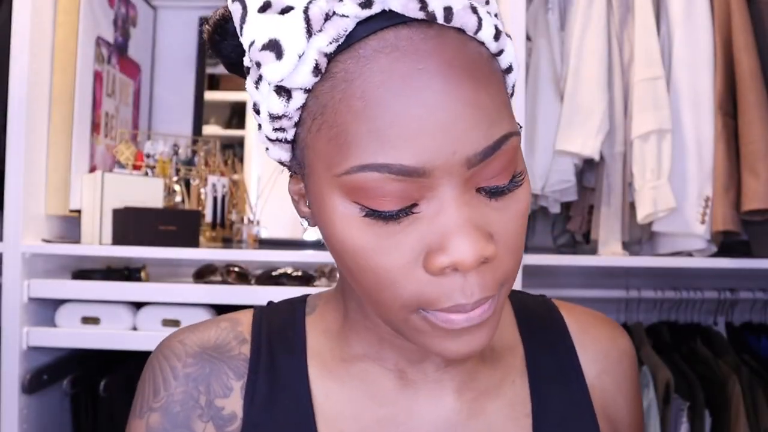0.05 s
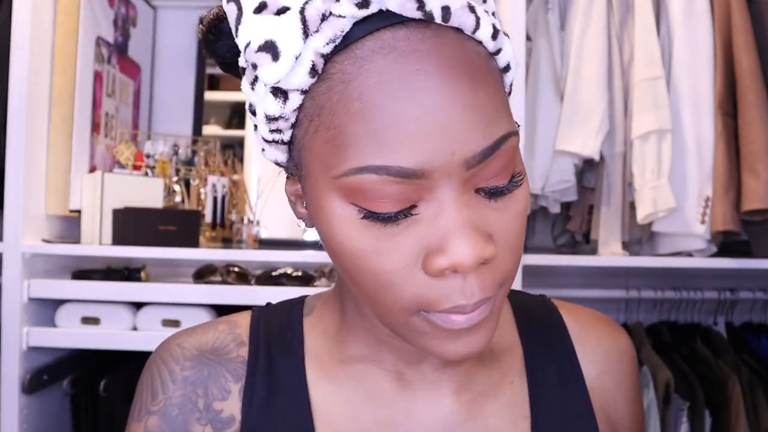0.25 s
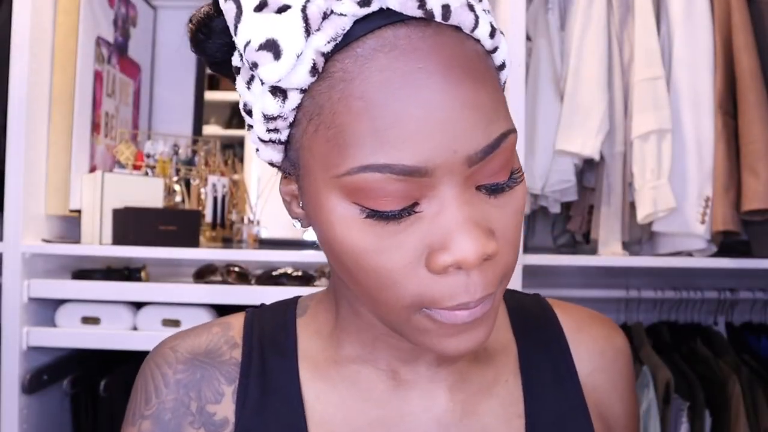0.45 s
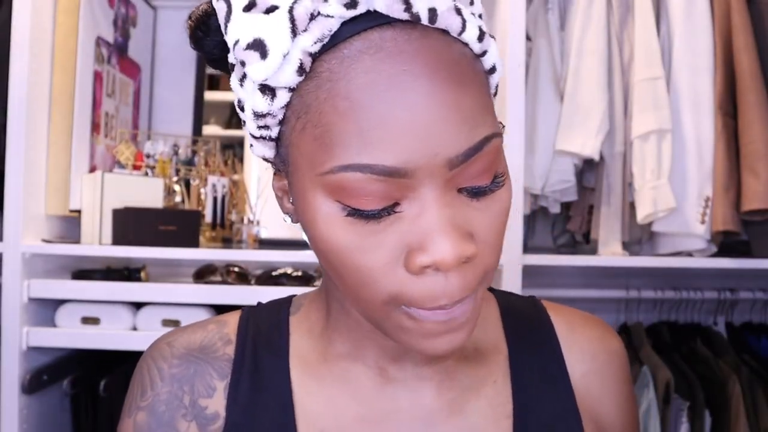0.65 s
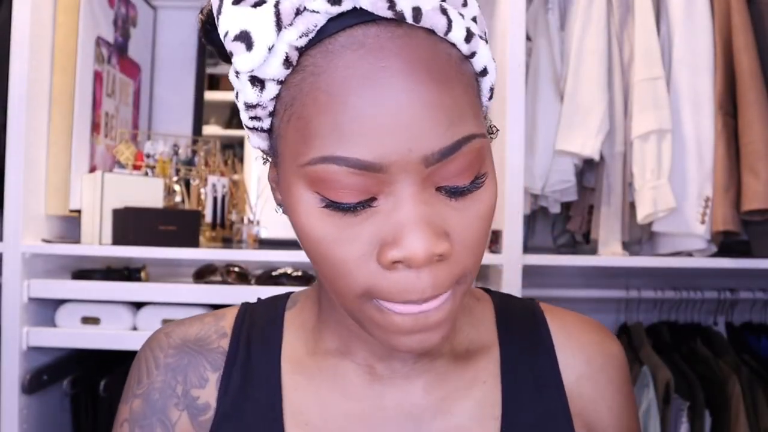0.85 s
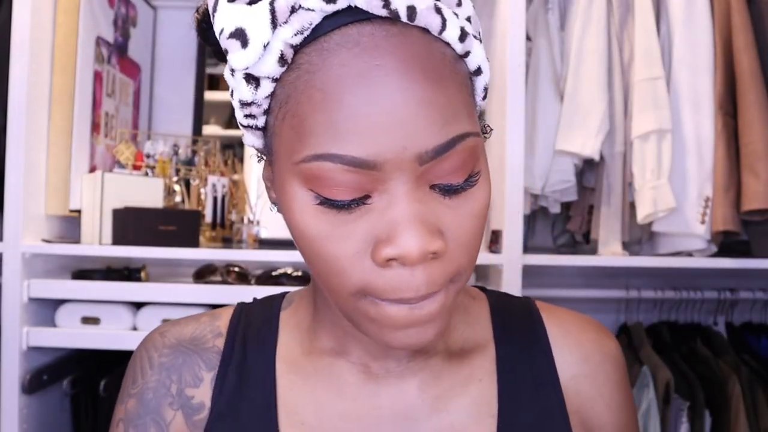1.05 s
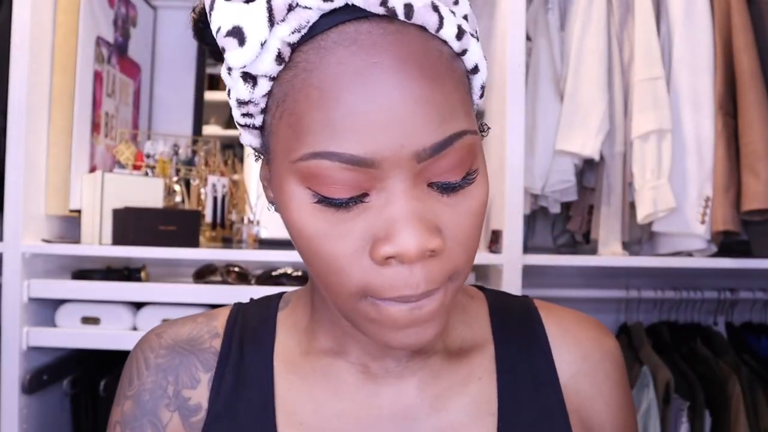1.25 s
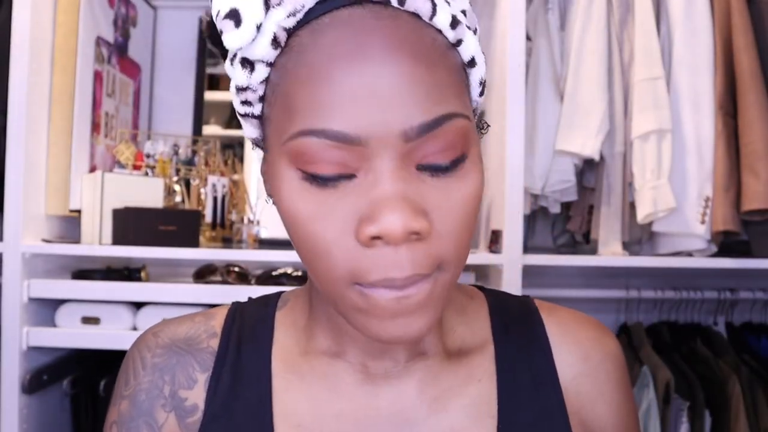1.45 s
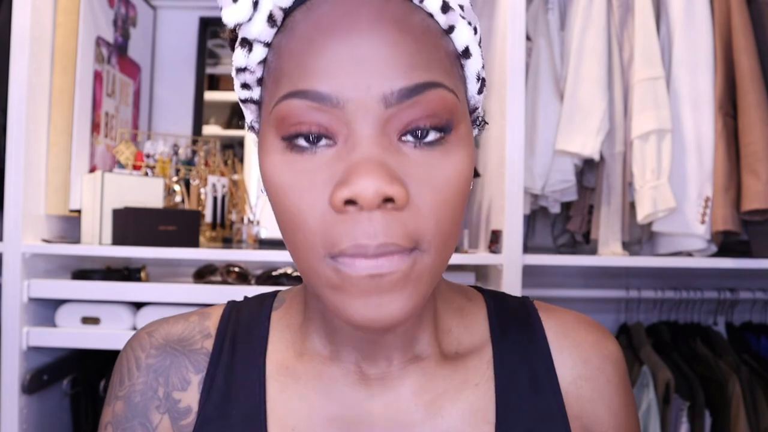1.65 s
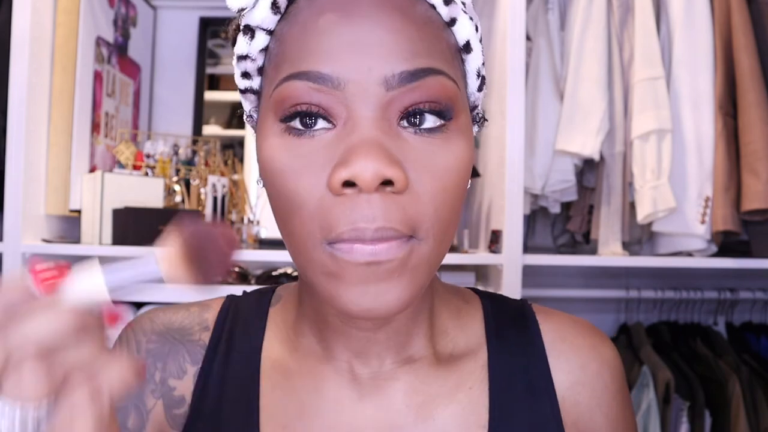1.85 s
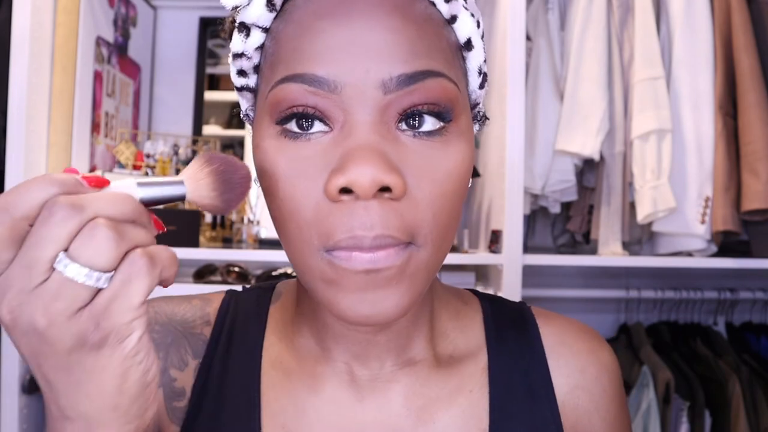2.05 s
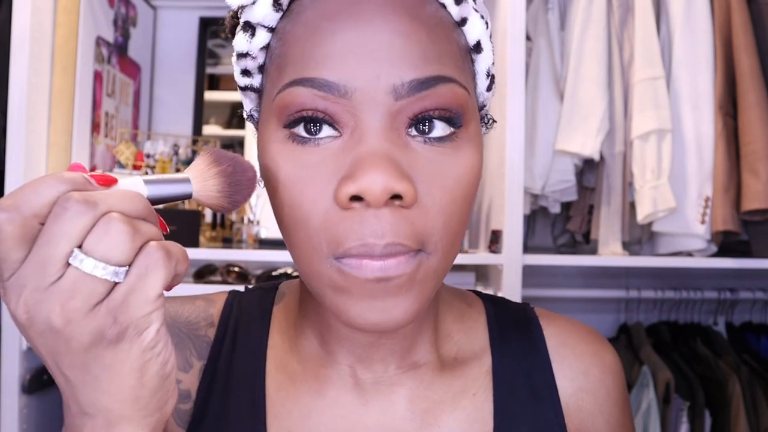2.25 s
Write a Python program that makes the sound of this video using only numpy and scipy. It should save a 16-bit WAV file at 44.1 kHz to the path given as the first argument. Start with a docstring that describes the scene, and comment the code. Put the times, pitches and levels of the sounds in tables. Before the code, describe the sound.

A plastic powder compact and brush handle clatter briefly on a wooden table with a soft drag of bristles. Two small lid clicks follow, then a fainter one, close to the microphone in a quiet closet.

```python
"""A clothes-lined closet, a camera's stereo microphone close to a wooden dressing table.
A plastic powder compact and a brush handle clatter on the wood: each knock is a short rattle of hard
contacts that cracks brightly and rings the hollow case and table top. Bristles and case drag softly.
Three small dry ticks of the lid follow, the last with a faint rustle of the arm, over quiet room tone."""
import sys
import numpy as np
from scipy import signal
from scipy.fft import rfft, irfft
from scipy.io import wavfile

SR = 44100
rng = np.random.default_rng(int(sys.argv[2]) if len(sys.argv) > 2 else 0)


def unload_audio(sound):
    """Save the sound as a 16-bit wav file, at the path given as the first command line argument."""
    columns = np.transpose(np.atleast_2d(sound))
    # keep every value between -1 and 1, then stretch to whole-number steps
    steps = np.round(np.clip(columns, -1, 1) * 32767)
    wavfile.write(sys.argv[1], SR, steps.astype(np.int16))


N = 101121
HZ = np.maximum(np.arange(N // 2 + 1) * SR / N, 1)

# Modes of the hollow case and table top. Each row: pitch in Hz, relative level in dB, T60 in seconds.
BODY_MODES = [(192.8, 0, 0.05), (439, -0.5, 0.076), (449.6, -3, 0.037), (531, -9.5, 0.075), (624, -7, .065),
              (673, 0.15, 0.046), (788, -11.5, 0.17), (878, -7, 0.041), (933, -11, 0.055),
              (1059, -2, 0.028), (1200, -3, 0.033), (1288, -10.5, .045), (1408, -8, 0.031),
              (1801, -4, 0.017)]


def amp(db):
    """Decibels to gain."""
    return 10 ** (np.asarray(db) / 20)


def at_hz(points, hz):
    """Reads a table on a log-frequency axis."""
    return np.interp(np.log(hz), np.log(np.array(points)[:, 0]), np.array(points)[:, 1])


def filtered(x, response):
    """Applies a frequency response given on HZ."""
    return irfft(rfft(x) * response, N)


def high_pass(x, hz):
    """Steep bass cut."""
    return signal.sosfilt(signal.butter(4, hz, "high", fs=SR, output="sos"), x)


def resonance(x, hz, q):
    """One broad peak around hz."""
    return signal.lfilter(*signal.iirpeak(hz, q, fs=SR), x)


def ring(clicks, hz, t60):
    """Each click starts a sine that dies by 60 dB in t60 seconds."""
    decay, angle = amp(-60 / (t60 * SR)), 2 * np.pi * hz / SR
    return signal.lfilter([0, np.sin(angle)], [1, -2 * decay * np.cos(angle), decay ** 2], clicks + 1e-18)


def add(out, start, x):
    """Mixes x in at start seconds."""
    i = int(start * SR)
    out[i:i + len(x)] += x[:N - i]


def room_tone():
    """Soft air and microphone hiss, centre and sides coloured apart; the lowest air swells at random."""
    # Spectra of the centre and the sides. Each row: frequency in Hz, relative level in dB.
    mid_colour = [(12, -34.5), (20, -8), (49, -0.5), (393, -9.5), (491, -10.5), (746, -14), (834, -15),
                  (3540, -24.5), (6720, -33), (11700, -47.5), (15500, -48)]
    side_colour = [(12, -70.5), (20, -38), (129, -4.5), (315, -0.5), (549, -3.5), (631, -4.5), (881, -5.5),
                   (4680, -19), (11400, -28.5), (13900, -35), (15500, -73)]
    rumble_hz, swell_db, left_lean = 58.6, 4.5, 0.11
    mid_noise, side_noise = rng.standard_normal((2, N))
    drift = filtered(rng.standard_normal(N), np.exp(-HZ / 5))
    mid = filtered(mid_noise, amp(at_hz(mid_colour, HZ)))
    rumble = filtered(mid, 1 / (1 + (HZ / rumble_hz) ** 4))
    mid = mid - rumble + rumble * amp(swell_db * drift / drift.std())
    side = filtered(side_noise + left_lean * mid_noise, amp(at_hz(side_colour, HZ)))
    mid, side = amp(-61.5) * mid / mid.std(), amp(-59.5) * side / side.std()
    return np.array([mid + side, mid - side])


def air_puff():
    """A push of air at the microphone: one soft low bump, the same in both ports."""
    push = np.zeros(N)
    push[int(.187 * SR)] = amp(-49)
    return ring(push, hz=42, t60=.09)


def closet():
    """Stereo impulse response: early reflections off table and shelves, then a tail dying by band."""
    # Decay among the clothes. Each row: frequency in Hz, T60 in seconds.
    decay_times = [(200, .13), (1000, .17), (4000, .11), (7000, .1), (12000, .1)]
    # Colour of the reflections. Each row: frequency in Hz, relative level in dB.
    colour = [(300, 9), (1500, 1), (4000, 1), (9000, -4.5), (13000, 0.5)]
    early_per_s, early_db, early_fall_s = 1500, 4.5, 0.0029
    t = np.arange(SR // 2) / SR
    edges = 100 * 2 ** np.arange(0, 7.6, .5)
    noise = rng.standard_normal((2, 2, len(t)))   # late and early, each left and right
    noise[1] *= (rng.random((2, len(t))) < early_per_s / SR) * np.sqrt(SR / early_per_s)
    response = 0
    for low, high in zip(edges, edges[1:]):
        hz = np.sqrt(low * high)
        late, early = signal.sosfilt(signal.butter(1, [low, high], "band", fs=SR, output="sos"), noise)
        late *= amp(-60 * t / at_hz(decay_times, hz))
        early *= amp(early_db) * np.exp(-t / early_fall_s)
        response += amp(at_hz(colour, hz)) * (late + early)
    fade_in = np.minimum(t / 0.00046, 1)
    return response / np.sqrt(np.sum(response ** 2) / 2) * fade_in


def microphone(x, lag_s, closet_db):
    """Direct sound reaches the nearer right port first and brighter; the closet answers on both."""
    # Right port over left, then the response of both. Each row: frequency in Hz, gain in dB.
    right_over_left = [(300, -1), (2000, 1), (6000, 2), (12000, 6)]
    mic_response = [(1000, 0), (12000, 2), (13500, -9.5), (16000, -10)]
    lean = np.sqrt(amp(at_hz(right_over_left, HZ)))
    left = filtered(x, np.exp(-2j * np.pi * HZ * lag_s) / lean)
    right = filtered(x, lean)
    reflected = amp(closet_db) * signal.fftconvolve(x[None], closet(), axes=1)[:, :N]
    return filtered(np.array([left, right]) + reflected, amp(at_hz(mic_response, HZ)))


def widen(x):
    """The camera lifts the difference between its ports in the treble and narrows the bass."""
    # Stereo width. Each row: frequency in Hz, gain of the side signal in dB.
    side_gain = [(250, -11), (500, -7), (1000, 2), (2000, 9), (4000, 4), (8000, 4), (12000, 7)]
    mid = (x[0] + x[1]) / 2
    side = filtered((x[0] - x[1]) / 2, amp(at_hz(side_gain, HZ)))
    return np.array([mid + side, mid - side])


def swish():
    """Bristles and case drag, and last the arm rustles: dense grains hiss and faintly stir the case."""
    # Each row: start, peak and end in seconds, gain in dB, centre of the hiss in Hz.
    strokes = [(0, 0.018, 0.24, -51, 1740), (0.077, 0.134, 0.21, -51, 3380),
               (0.203, .215, 0.29, -53.5, 3000), (0.26, 0.262, 0.35, -31, 3433),
               (0.3, 0.327, .42, -35, 1980), (.245, .25, .315, -30, 5000), (1.725, 1.926, 2.09, -66, 2262)]
    t, hiss = np.arange(N) / SR, np.zeros(N)
    for start, peak, end, db, hz in strokes:
        grains = rng.standard_normal(N) * rng.exponential(1, N)
        swell = np.interp(t, [start, peak, end], [0, 1, 0]) ** 2
        hiss += amp(db) * resonance(resonance(grains, hz, q=.6), hz, q=.6) * swell
    body = sum(amp(db) * ring(hiss, hz, t60) for hz, db, t60 in BODY_MODES)
    return hiss + amp(-23.5) * body


def lid_ticks():
    """Each tick is one hard contact with three tiny bounces and a short ring of the lid, no bass."""
    # Each row: start in seconds, gain in dB, centre and bass cut in Hz, bright edge and lid ring in dB.
    snaps = [(0.5454, -20, 9030, 3800, -2.5, -30), (0.6600, -18, 6500, 2104, 3.5, -30.5),
             (1.7625, -33.5, 7100, 2130, 5.5, -21.5)]
    # Each row: delay after the contact in seconds, level against it in dB.
    bounces = [(.0005, -23), (.0016, -5), (.0028, -23)]
    out = np.zeros(N)
    for start, db, hz, cut_hz, edge_db, ring_db in snaps:
        clicks = np.zeros(1024)
        clicks[0] = 1
        for delay, bounce_db in bounces:
            clicks[int(delay * SR)] = amp(bounce_db) * rng.choice([-1, 1])
        edge = amp(edge_db) * np.diff(clicks, prepend=0)
        snap = high_pass(resonance(clicks, hz, q=.89) + edge, cut_hz)
        lid = amp(ring_db) * ring(clicks, hz=2282, t60=0.016)
        add(out, start, amp(db) * (snap + lid))
    return out


def crack(db, hz, length_s):
    """A short rattle of hard contacts cracks in the treble; harder knocks have a brighter edge."""
    contacts_per_s, fall_s, flank_db = 4000, 0.00072, -2.5
    t = np.arange(1024) / SR
    contacts = rng.standard_normal(len(t)) * (rng.random(len(t)) < contacts_per_s / SR)
    contacts[0] = 1
    contacts *= np.exp(-np.maximum(t - length_s, 0) / fall_s)
    broad = resonance(contacts, hz, q=.8)
    edge = amp(-13.5 + 0.62 * db) * np.diff(broad, prepend=0)
    rattle = resonance(broad, hz, q=.8) + amp(flank_db) * broad + edge
    return amp(db) * rattle / np.abs(rattle).max()


def knocks():
    """Compact and handle hit the wood: each knock cracks at one of four places and rings every mode."""
    # Each row: start in seconds, crack level in dB, crack centre in Hz, rattle length in seconds,
    # body gain in dB, extra gain of the low thud in dB, body tilt in dB per octave.
    blows = [(0.0002, -32.5, 3180, 0.00082, -43.5, 9.5, -6), (0.0358, -22, 4030, 0.00096, -41, -16, -7),
             (.0415, -38, 4200, 0.0051, -39, -17, -9.5), (.122, -55.5, 3000, 0.0021, -54.5, -9, 1),
             (0.1635, -53, 4030, 0.013, -57, -5.5, -4), (0.1926, -19, 4320, 0.0016, -43, -18, -8.5),
             (.2003, -30.5, 4029, 0.0018, -44.5, -15, -7.5),
             (0.2233, -22.5, 4012, 0.0019, -39.5, 15.5, 4.5), (0.2298, -32, 4500, 0.00072, -51.5, 0, 6.5),
             (0.2388, -31, 4550, 0.00069, -45, 2, -0.5), (0.2447, -5.5, 4713, 0.0045, -25.5, -0.5, 5),
             (0.2507, -9, 5240, 0.0059, -48, -10.5, 11), (0.2560, -1.5, 6253, 0.0038, -26.5, 5.5, -0.5),
             (.2640, -18.5, 3900, .004, -36.5, -8.5, 6), (.2750, -24.5, 3940, 0.0019, -39.5, -5, -4.5),
             (0.2836, -17, 4600, .0031, -38.5, -3.5, -3.5), (0.2971, -9.5, 5990, 0.0021, -40.5, -10, -1),
             (0.3131, -6.5, 5670, .004, -22.5, -2, 4), (.3195, -14.5, 3000, .003, -27.5, -10, 1.5),
             (0.3538, -42.5, 4170, 0.0027, -39, -3.5, -3), (.3605, -46, 2980, 0.0035, -40.5, -18.5, 2.5),
             (0.3938, -51, 3600, 0.0033, -38.5, -35.5, -2), (.4035, -45, 3000, .003, -43.5, -23, -7.5),
             (.4165, -60, 2975, 0.0025, -45.5, -18.5, -6.5), (.4270, -51, 3020, 0.0037, -49.5, -28, -17),
             (.4480, -58, 3040, 0.0033, -53.5, -20, -12)]
    places, thud_below_hz, tilt_pivot_hz = 4, 300, 600
    spread_db, max_delay_s = 1.5, .003
    cracks, pushes = np.zeros((places, N)), np.zeros((len(BODY_MODES), N))
    for n, (start, crack_db, crack_hz, length_s, body_db, thud_db, tilt) in enumerate(blows):
        add(cracks[n % places], start, crack(crack_db, crack_hz, length_s))
        for k, (hz, mode_db, _) in enumerate(BODY_MODES):
            delay = max_delay_s * rng.random() * (hz > thud_below_hz)   # upper modes trail the crack
            db = body_db + mode_db + tilt * np.log2(hz / tilt_pivot_hz) + thud_db * (hz < thud_below_hz)
            db += spread_db * rng.standard_normal()
            pushes[k, int((start + delay) * SR)] += amp(db) * (-1) ** k
    body = sum(ring(push, hz, t60) for push, (hz, _, t60) in zip(pushes, BODY_MODES))
    return cracks, high_pass(body, hz=145)


def scene():
    """Knocks, swish and ticks close to the microphone, the body drier than the cracks, over room tone."""
    knock_lag_s, tick_lag_s = 7.3e-5, 3.6e-5
    cracks, body = knocks()
    near = sum(microphone(place, knock_lag_s, closet_db=-1.5) for place in cracks)
    near += microphone(body + swish(), knock_lag_s, closet_db=-12)
    near += microphone(lid_ticks(), tick_lag_s, closet_db=-5)
    return widen(near) + air_puff() + room_tone()


def record(dry):
    """Any peak above full scale clips, and the highest treble is cut."""
    cutoff_hz = 15746
    return signal.sosfilt(signal.cheby2(12, 60, cutoff_hz, fs=SR, output="sos"), np.clip(dry, -1, 1))


dry = scene()
out = record(dry)
unload_audio(out)
```